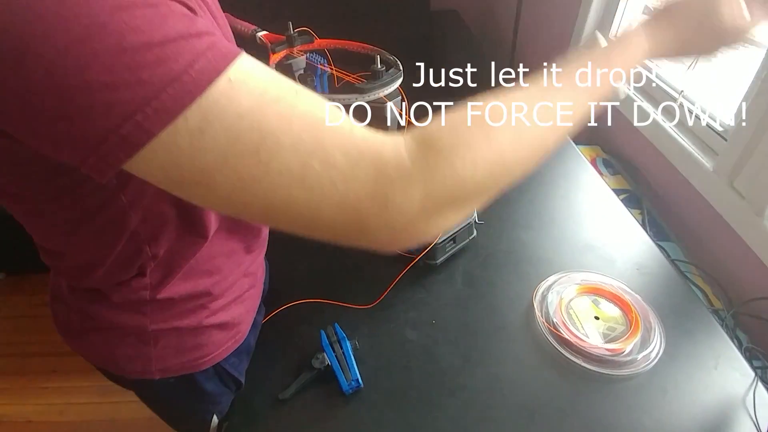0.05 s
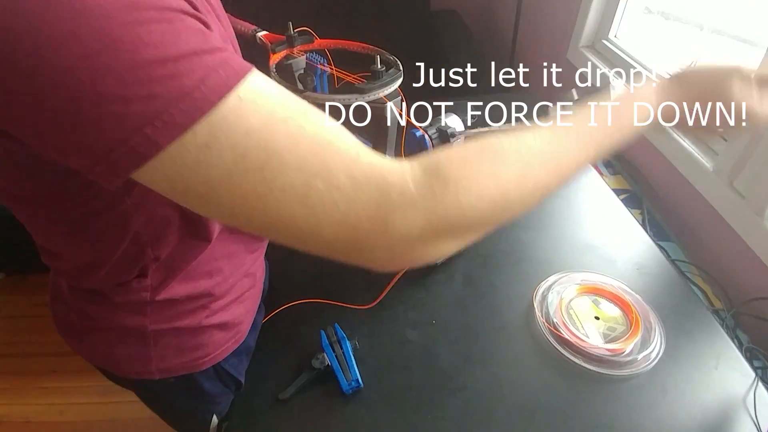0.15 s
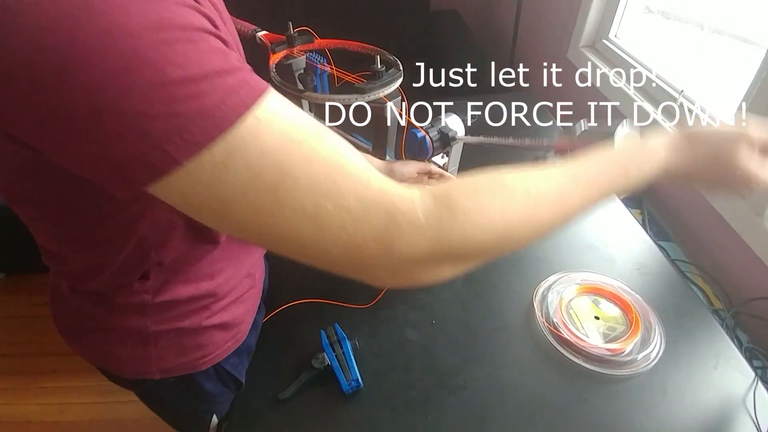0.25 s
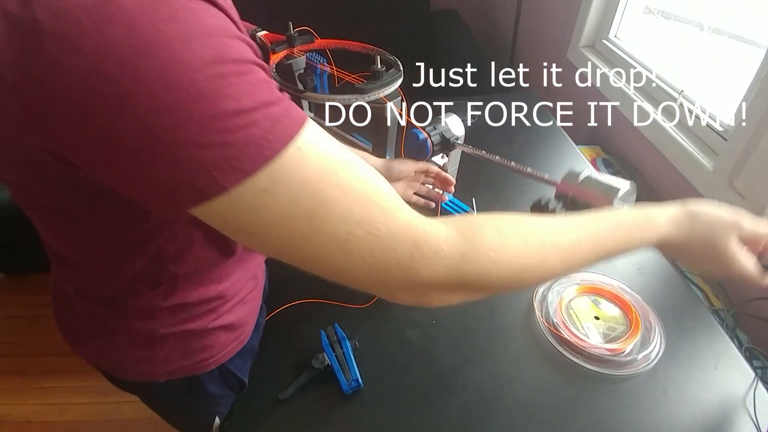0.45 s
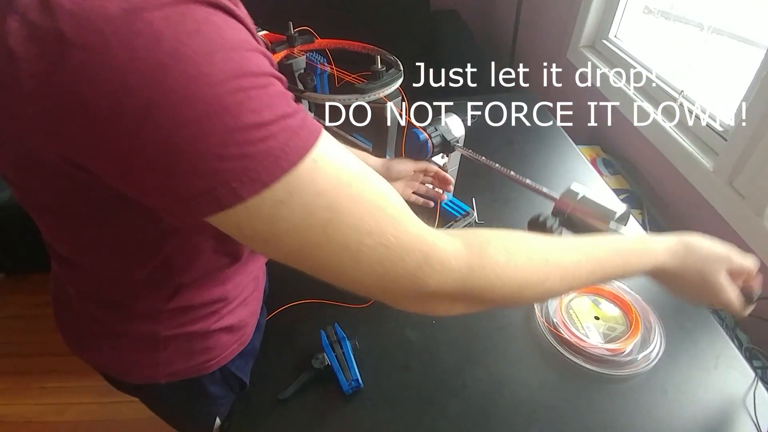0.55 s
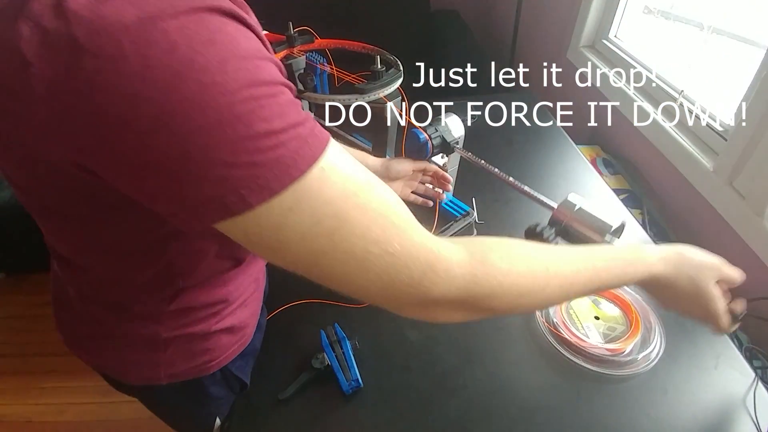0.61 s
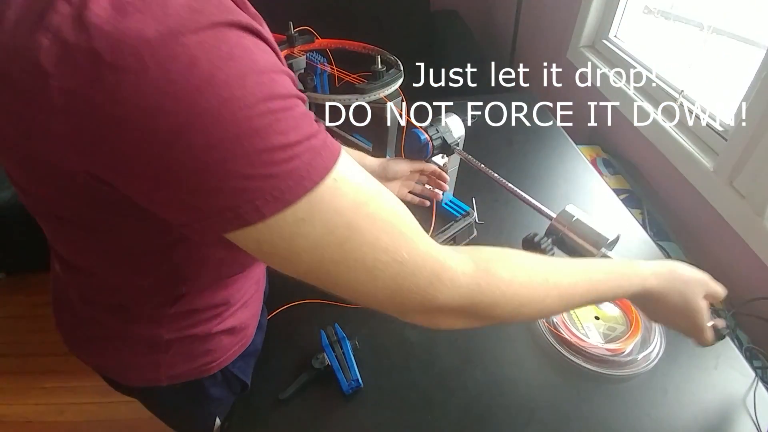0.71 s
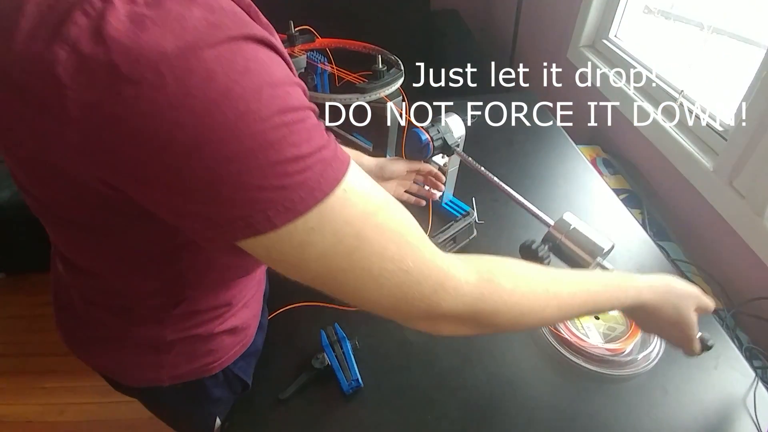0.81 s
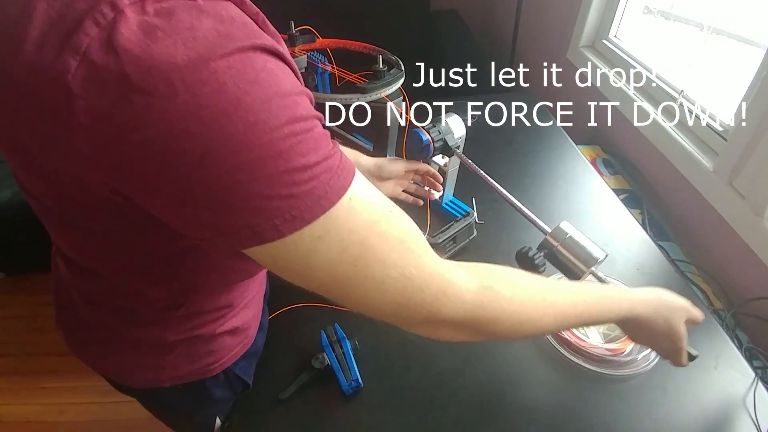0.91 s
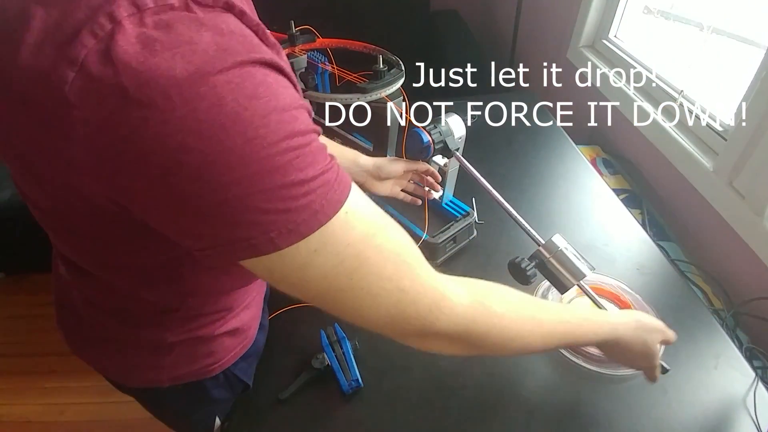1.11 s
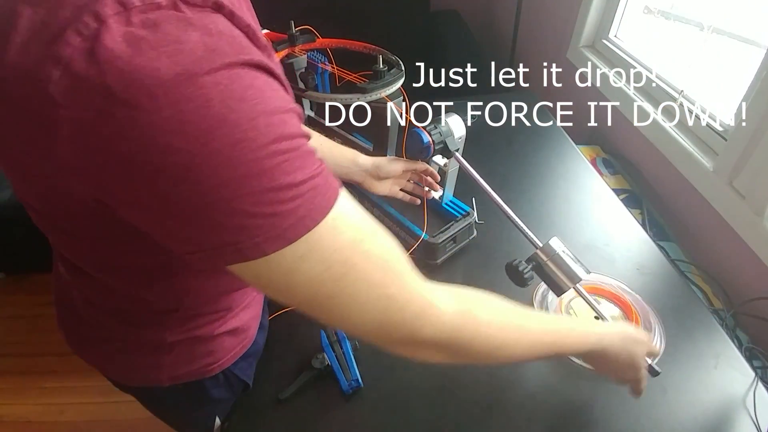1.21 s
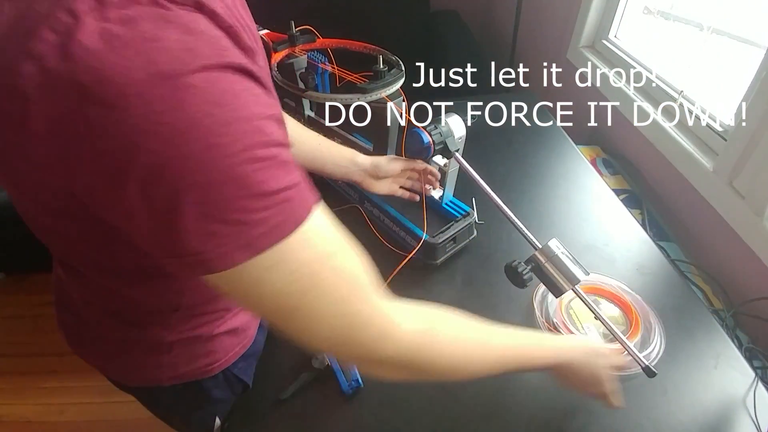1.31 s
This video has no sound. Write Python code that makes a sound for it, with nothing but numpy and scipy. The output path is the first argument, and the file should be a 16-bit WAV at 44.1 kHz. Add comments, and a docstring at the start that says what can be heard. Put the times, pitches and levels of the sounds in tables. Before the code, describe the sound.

One sharp metallic click with a brief steel ring in a small, quiet room.

```python
"""First comes the tone of a small room on a stereo pair: low rumble, faint hum, a rustle of movement.
The weighted bar of a racquet stringing machine is lowered and its ratchet catch snaps once:
four quick contacts, mostly right of centre, ring the steel, and the room answers in both microphones.
Soft low bumps of handling and of someone shifting their weight follow, dead centre."""
import sys
import numpy as np
from scipy import signal
from scipy.fft import rfft, irfft
from scipy.io import wavfile

SR = 44100
rng = np.random.default_rng(int(sys.argv[2]) if len(sys.argv) > 2 else 0)


def digitize_waveform(pressure):
    """Quantize a signal to 16-bit integers and store it at the path in sys.argv[1].

    Rows of a 2-D input are taken as channels; values are limited to [-1, 1].
    """
    field = np.atleast_2d(pressure).T
    bounded = np.clip(field, -1, 1)
    quanta = np.round(bounded * 32767).astype(np.int16)
    wavfile.write(sys.argv[1], SR, quanta)


N = 59535

# room rumble and hiss: frequency_hz, relative_density_db
RUMBLE_COLOUR = [(15, -47), (25, -28), (133, -9), (233, 1), (281, -10), (349, -11), (509, -19), (631, -17),
                 (703, -20.5), (762, -23.5), (1450, -27), (1850, -30), (15500, -37)]
# likeness of rumble and rustle between the microphones: frequency_hz, correlation
NOISE_LIKENESS = [(60, 0.8), (180, 0.86), (550, 0.3), (1650, -0.01), (4970, 0), (15000, 0.1)]
# bands of the hum: pitch_hz, level_db
HUM_BANDS = [(120, -71), (230, -66.5), (343, -75.5)]
# rise and fall of the rustle: time_s, level_db
RUSTLE_LEVELS = [(0, -54.5), (.14, -54.5), (.19, -55), (.4, -56), (.5, -66.5), (.635, -63), (.665, -53),
                 (.75, -59), (.85, -64.5), (.89, -57.5), (.96, -69), (1.03, -56.5), (1.13, -70),
                 (1.2, -58.5), (1.27, -64), (1.35, -57.5)]
# colour of the rustle: frequency_hz, relative_density_db
RUSTLE_SPECTRUM = [(25, -30), (55, 9.5), (100, 1), (300, -5.5), (600, -13), (1100, -28.5), (3000, -38.5),
                   (16000, -88)]
# contacts of the catch within its one click: start_s, relative_level_db, right_minus_left_db
CATCH_CONTACTS = [(0.2059, -14, -4), (0.2095, -5.5, 11), (0.2101, 3, 6), (0.2129, -5, 15.5)]
# colour of the snap as picked up, with a narrow microphone or coder notch near 10.7 kHz:
# frequency_hz, relative_density_db
SNAP_COLOUR = [(60, -17), (200, 1.5), (420, -1.5), (650, 2.5), (1050, 7.5), (1230, -7.5), (1700, -6.5),
               (2000, -6), (2230, 2.5), (2500, -4), (3300, -4), (4200, -1), (4550, 3.5), (5200, -7),
               (5850, 3.5), (6500, -4.5), (7700, -0.5), (8400, 5), (9100, 11.5), (9700, -6.5),
               (10250, -10.5), (10700, -28), (11200, -12.5), (11900, -2.5), (15400, -4), (16200, -15)]
# direct path from catch to microphones: frequency_hz, relative_gain_db
DIRECT_COLOUR = [(100, 13.5), (2000, -7), (6000, -1), (9000, 1.5), (15000, 2)]
# reverberation of the room: frequency_hz, t60_s
ROOM_DECAY = [(100, 0.44), (500, 0.22), (1100, .22), (2300, 0.26), (5500, 0.24), (9000, 0.21),
              (14000, 0.16)]
# likeness of the reflections between the microphones: frequency_hz, correlation
ROOM_LIKENESS = [(60, 0.6), (290, 1), (640, 0), (1300, 0.02), (15000, 0)]
# bumps of handling and of someone shifting their weight: start_s, peak_db, pitch_hz, swell_s
SOFT_BUMPS = [(0.208, -48.5, 133, 0.018), (.215, -46, 56.9, .04), (.255, -48.5, 227, 0.025),
              (0.337, -56, 63.5, 0.047), (0.654, -47, 72.2, 0.04), (.69, -55, 231.8, 0.033),
              (0.821, -55, 66.6, 0.039), (.997, -44.5, 129.5, 0.0099), (1.002, -50.5, 213.3, 0.023),
              (1.006, -52.5, 56.2, 0.035), (1.155, -51.5, 61.8, 0.024), (1.279, -55, 50.4, 0.024)]
# modes of the frame: pitch_hz, level_db, t60_s
FRAME_MODES = [(532, -42.5, 0.14), (669, -50, 0.2), (851.4, -41, 0.092), (946, -48, 0.11),
               (1060, -40.5, 0.21)]
# modes of the steel bar: pitch_hz, relative_level_db, base_t60_s
BAR_MODES = [(1109, 0, 0.23), (2256, -10, 0.21), (2945, -18, 0.27), (3375, -9, 0.19), (4597, -16, 0.28),
             (5803, -11, 0.22), (7063, -7, 0.14)]

TIME_S, BINS_HZ = np.arange(N) / SR, np.fft.rfftfreq(N, 1 / SR)


def amp(db):
    """Decibels to gain."""
    return 10 ** (np.asarray(db) / 20)


def unit(x):
    """Scales to rms 1."""
    return x / np.sqrt(np.mean(x ** 2) + 1e-20)


def read(points, hz):
    """Reads a table on a log-frequency axis."""
    table_hz, value = np.transpose(points)
    return np.interp(np.log(hz + 1), np.log(table_hz + 1), value)


def add(mix, start_s, sound):
    """Mixes a sound in at start_s."""
    part = mix[:, max(round(start_s * SR), 0):][:, :sound.shape[-1]]
    part += sound[..., :part.shape[1]]


def pan(db):
    """Left and right gains, the right louder by db."""
    return amp(np.array([[-db / 2], [db / 2]]))


def decay(t, t60, bend=1.205):
    """Gain of a decay that steepens as it dies (bend 1 is a plain exponential)."""
    return amp(-60 * (t / t60) ** bend)


def microphone_pair(likeness):
    """Left and right spectra of white noise, alike by band."""
    left, unrelated = rfft(rng.standard_normal((2, N)))
    shared = np.clip(read(likeness, BINS_HZ), -1, 1)
    return np.array([left, shared * left + np.sqrt(1 - shared ** 2) * unrelated])


def noise(colour):
    """Stereo noise of a given colour, rms 1."""
    return unit(irfft(microphone_pair(NOISE_LIKENESS) * amp(read(colour, BINS_HZ)), N))


def pulse(colour, size=4096):
    """The shortest causal click with a given colour."""
    log_gain = np.log(amp(read(colour, abs(np.fft.fftfreq(size, 1 / SR)))))
    minimum_phase = np.exp(np.conj(signal.hilbert(log_gain)))
    return np.fft.ifft(minimum_phase).real[:size // 2]


def rumble(level_db=-62):
    """Steady room tone: lows much alike at both microphones, a thin hiss spread wide."""
    return amp(level_db) * noise(RUMBLE_COLOUR)


def hum(width_hz=6.4):
    """A faint hum in the centre, wavering because each pitch is a narrow band of noise."""
    out = np.zeros(N)
    for hz, db in HUM_BANDS:
        band = 1 / (1 + (2 * (BINS_HZ - hz) / width_hz) ** 2)
        out += amp(db) * unit(irfft(rfft(rng.standard_normal(N)) * band, N))
    return out


def rustle():
    """Movement in the room: low noise that comes and goes."""
    return amp(np.interp(TIME_S, *np.transpose(RUSTLE_LEVELS))) * noise(RUSTLE_SPECTRUM)


def catch(snap_gain_db=-5, direct_gain_db=-13, chatter_s=0.0017, chatter_db=8):
    """Each contact reaches the microphones directly as a chattering snap, then by way of the room."""
    t = np.arange(SR // 20) / SR
    snap = amp(snap_gain_db) * pulse(SNAP_COLOUR)
    direct = signal.fftconvolve(snap, pulse(DIRECT_COLOUR))
    out, into_room = np.zeros((2, N)), np.zeros((1, N))
    for start_s, db, side_db in CATCH_CONTACTS:
        burst = rng.standard_normal((2, len(t))) * np.exp(-t / chatter_s)
        chatter = amp(chatter_db) * unit(burst) / np.sqrt(len(t))
        chatter[:, 0] += 1  # the strike itself
        contact = signal.fftconvolve(chatter, direct[None], axes=1)
        add(out, start_s, amp(direct_gain_db + db) * pan(side_db) * contact)
        add(into_room, start_s, amp(db) * snap)
    return out + room(into_room)


def room(sound, gain_db=-0.5, side_db=0.2, delay_s=0.0019, build_s=0.0065):
    """Dense reflections off nearby walls build up quickly and die band by band."""
    reflections = irfft(microphone_pair(ROOM_LIKENESS), N)
    hz, t, bands = signal.stft(reflections, SR, nperseg=256)
    bands *= decay(t, read(ROOM_DECAY, hz)[:, None])
    tail = signal.istft(bands, SR, nperseg=256)[1][:, :N]
    tail *= np.clip((TIME_S - delay_s) / build_s, 0, 1)
    answer = signal.fftconvolve(sound, unit(tail) / np.sqrt(N), axes=1)[:, :N]
    return amp(gain_db) * pan(side_db) * answer


def bumps():
    """Soft low bumps of handling and shifting weight swell and die, alike at both microphones."""
    out = np.zeros(N)
    for start_s, db, hz, swell_s in SOFT_BUMPS:
        age_s = np.maximum(TIME_S - start_s, 0)
        swell = (age_s / swell_s) ** 2 * np.exp(2 * (1 - age_s / swell_s))
        out += amp(db) * swell * np.sin(2 * np.pi * hz * age_s)
    return out


def ring(modes, rise_s=0.0036, spread_rad=1.44, flutter_depth=0.82, flutter_hz=22):
    """Dying modes reach the microphones out of step; reflections make them flutter at each."""
    t = np.arange(SR // 2) / SR
    offset = np.array([[-0.5], [0.5]]) * spread_rad
    lowpass = np.exp(-(np.fft.rfftfreq(len(t), 1 / SR) / flutter_hz) ** 2 / 2)
    out = np.zeros((2, len(t)))
    for hz, db, t60 in modes:
        wander = unit(irfft(rfft(rng.standard_normal((2, 2, len(t)))) * lowpass, len(t)))
        in_phase, quadrature = flutter_depth / np.sqrt(2) * wander
        phase = 2 * np.pi * hz * t + offset
        tone = (1 + in_phase) * np.sin(phase) + quadrature * np.cos(phase)
        out += amp(db) * decay(t, t60) * tone
    return out * (1 - np.exp(-t / rise_s))


def steel(bar_gain_db=-36.5, tilt_db_per_octave=-0.24, ping_boost_db=3.5, ping_t60_share=0.85,
          twin_detune=0.011, twin_db=-6):
    """Frame and bar ring together; the bar bends in two planes, so its modes beat in pairs."""
    ping_hz, ping_db, ping_t60 = BAR_MODES[0]  # the lowest mode carries the ping
    bar = [(ping_hz, ping_db + ping_boost_db, ping_t60 * ping_t60_share)]
    bar += [(hz, db + tilt_db_per_octave * np.log2(hz / ping_hz), t60) for hz, db, t60 in BAR_MODES[1:]]
    twins = [(hz * (1 - twin_detune), db + twin_db, t60) for hz, db, t60 in bar]
    return ring(FRAME_MODES) + amp(bar_gain_db) * ring(bar + twins)


def scene():
    """Room tone and movement, with the click, the bumps and the ringing steel on top."""
    mix = rumble() + hum() + rustle() + catch() + bumps()
    add(mix, CATCH_CONTACTS[1][0], steel())  # the second contact sets the steel ringing
    return mix


def record(dry, edge_hz=16000):
    """The recorder's band limit takes off the highest treble."""
    lowpass = signal.firwin(255, edge_hz, window=("kaiser", 8), fs=SR)
    return signal.oaconvolve(dry, lowpass[None], "same")


dry = scene()
out = record(dry)
digitize_waveform(out)
```